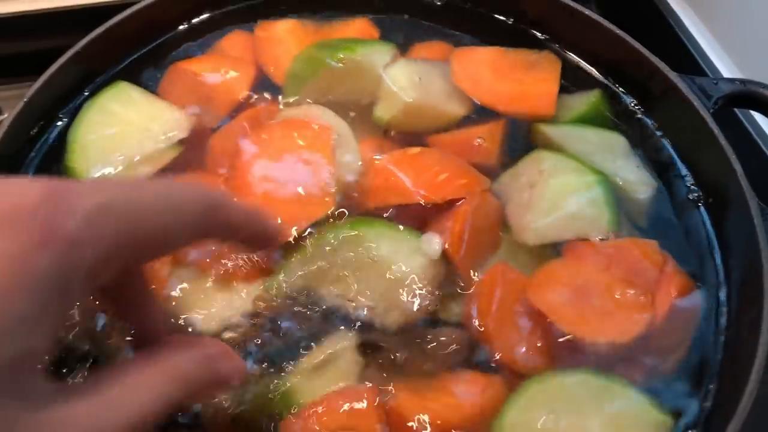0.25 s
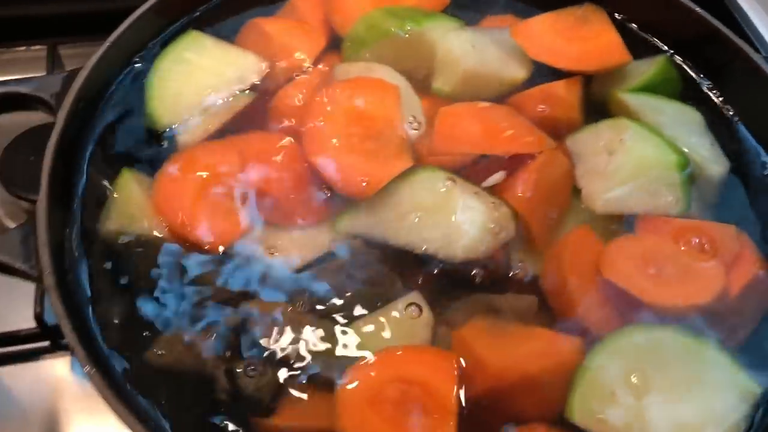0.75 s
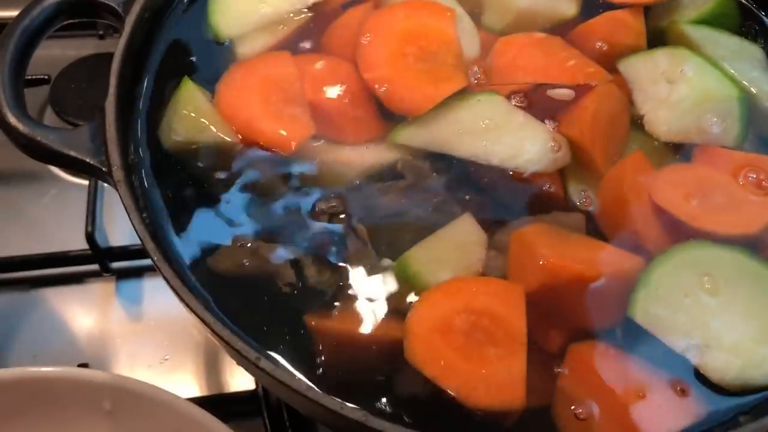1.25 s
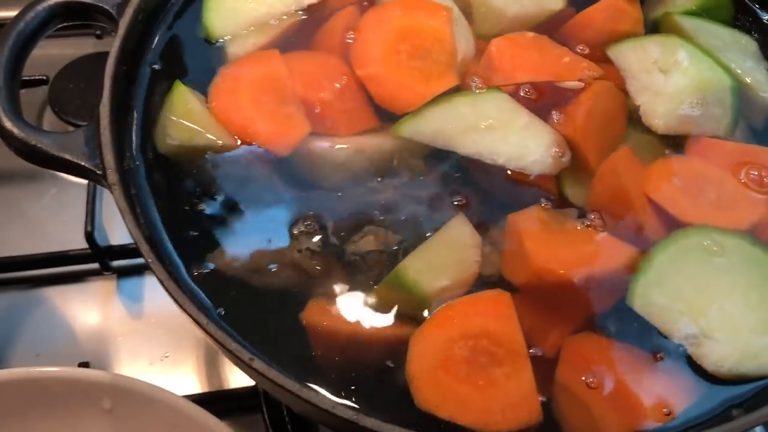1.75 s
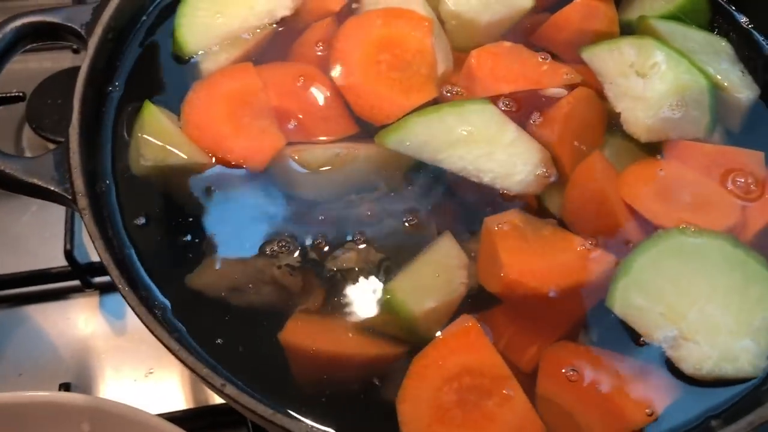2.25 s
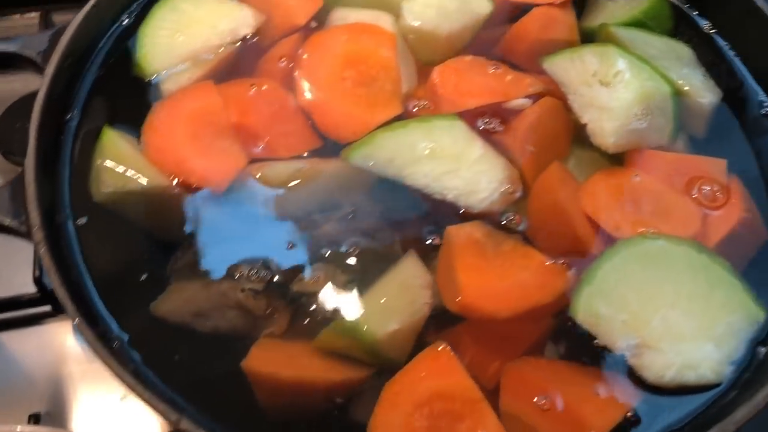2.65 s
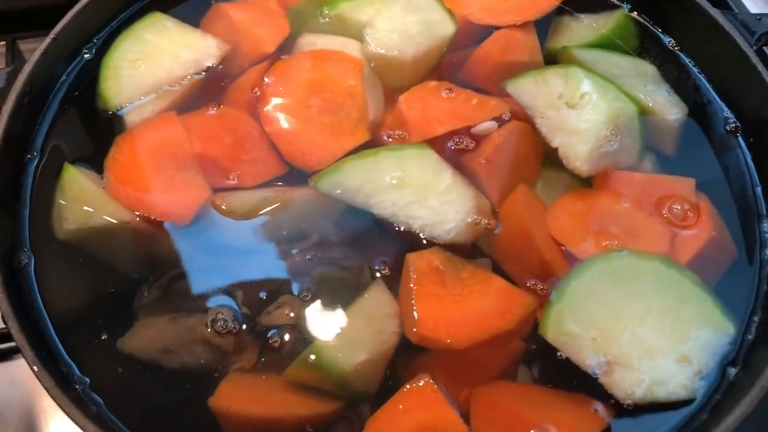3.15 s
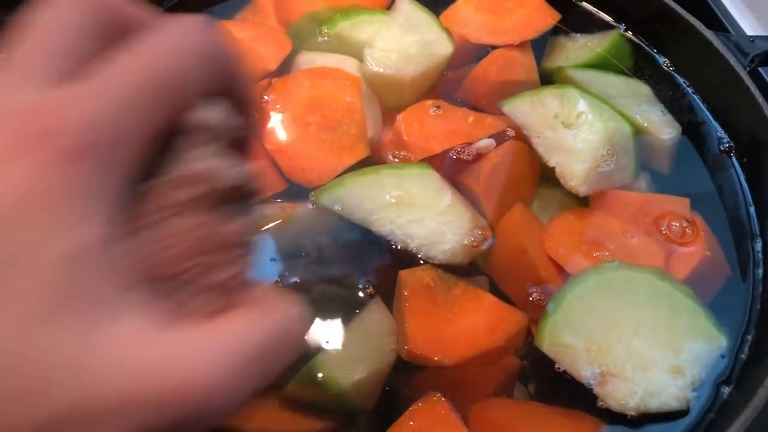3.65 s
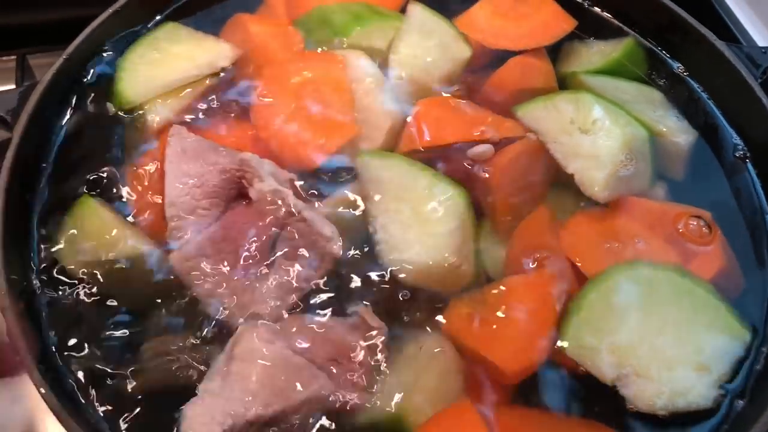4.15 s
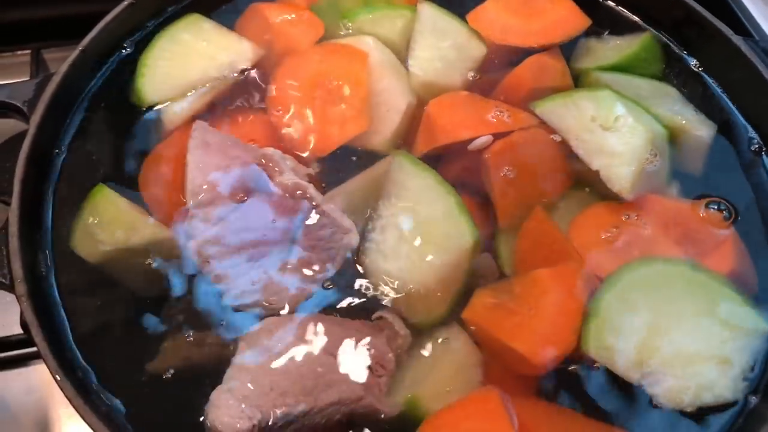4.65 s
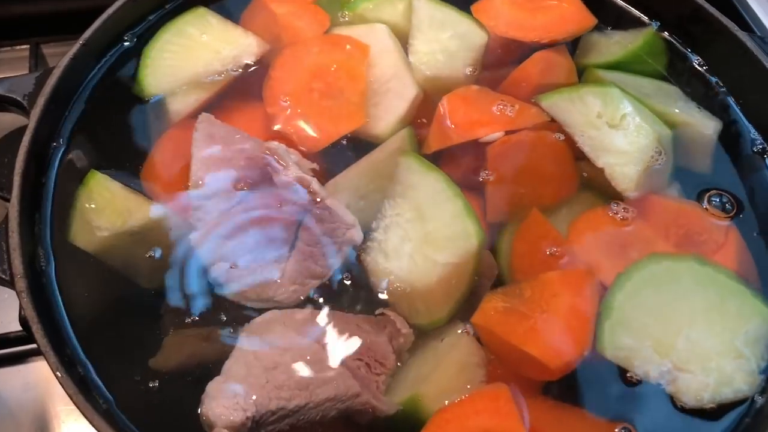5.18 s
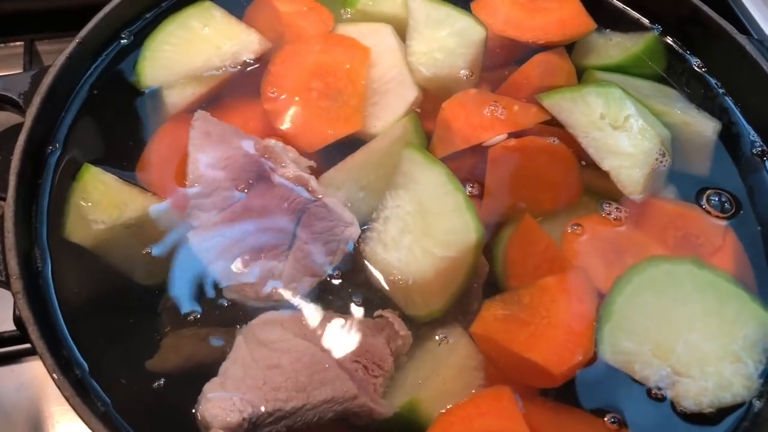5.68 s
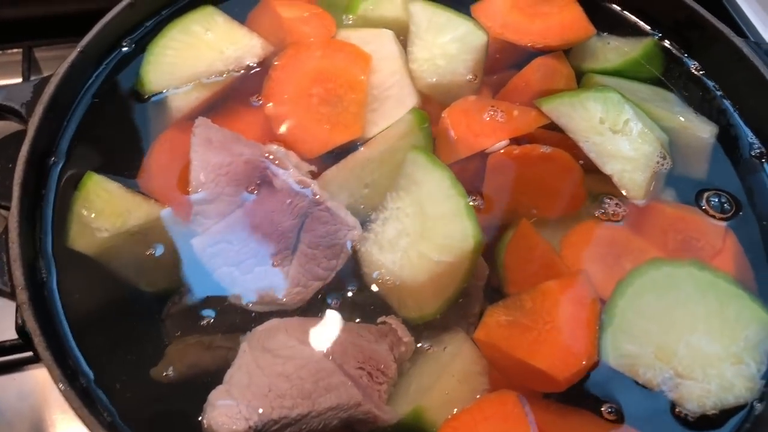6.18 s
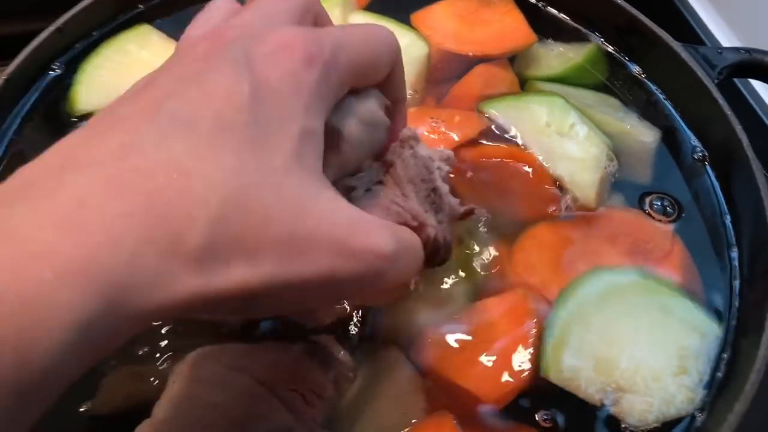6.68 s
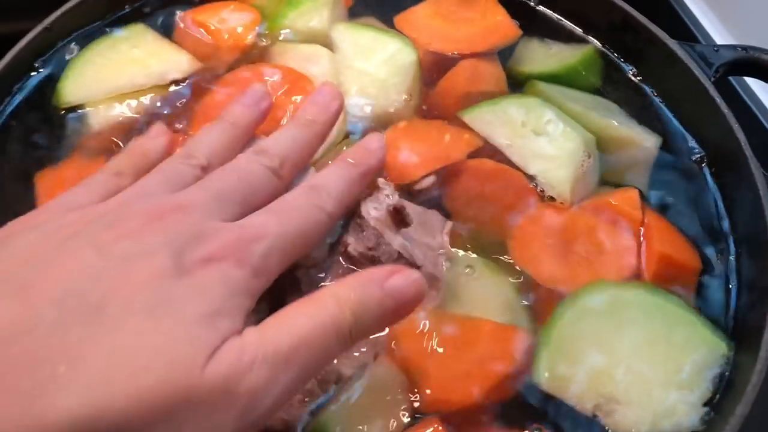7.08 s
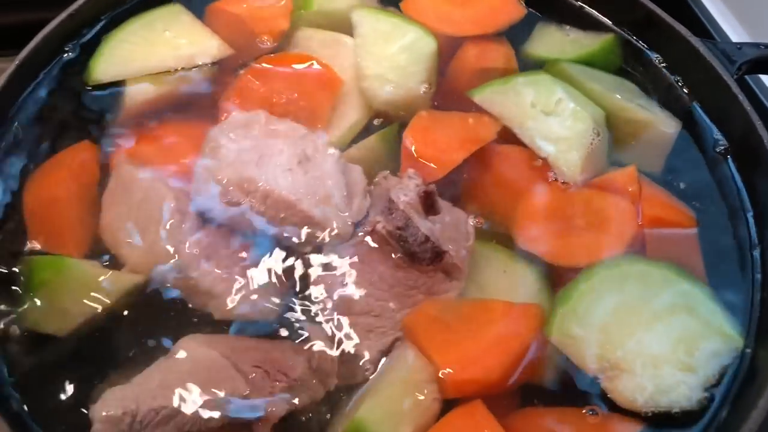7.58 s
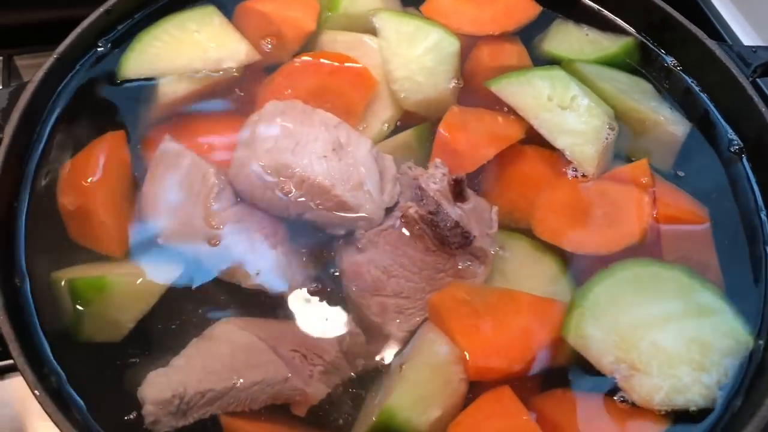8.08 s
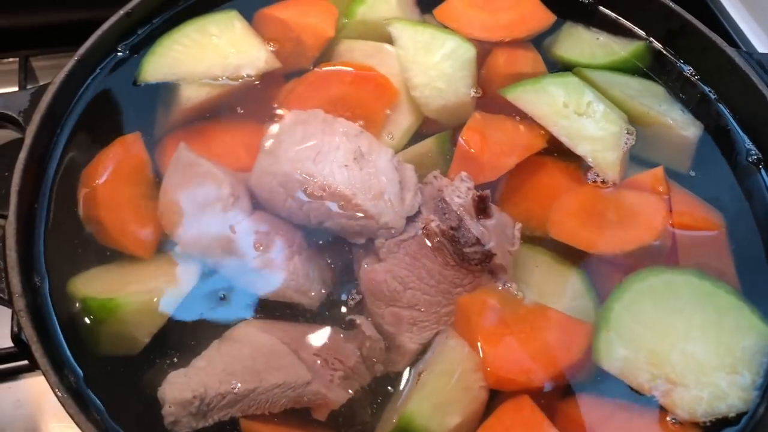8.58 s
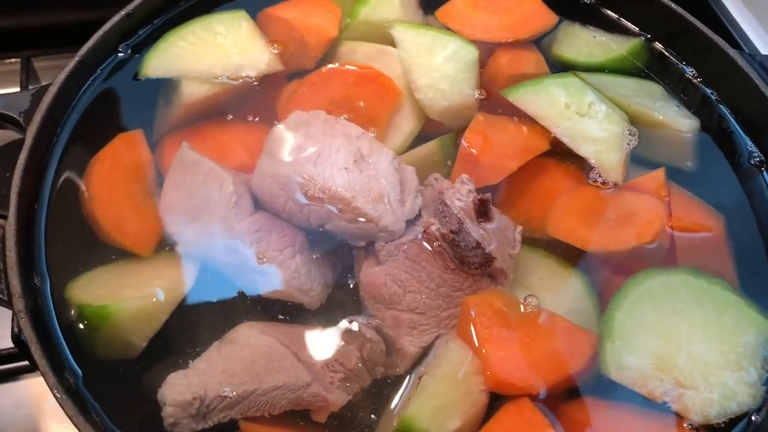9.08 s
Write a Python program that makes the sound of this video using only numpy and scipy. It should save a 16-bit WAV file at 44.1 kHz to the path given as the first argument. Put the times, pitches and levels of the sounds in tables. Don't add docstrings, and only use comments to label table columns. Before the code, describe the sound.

Small crisp wet ticks, a few sticky smacks, sharp dish clacks and one hard counter knock stand out over soft room rumble and fridge hum.

```python
import sys
import numpy as np
from scipy import signal
from scipy.fft import rfft, irfft
from scipy.io import wavfile
from scipy.ndimage import uniform_filter1d

SR = 44100
rng = np.random.default_rng(int(sys.argv[2]) if len(sys.argv) > 2 else 0)


def generate_wav(signal):
    frames = np.transpose(np.atleast_2d(signal))
    scaled = np.clip(frames, -1, 1) * 32767
    pcm = np.round(scaled).astype(np.int16)
    wavfile.write(sys.argv[1], SR, pcm)


def amplitude_ratio(level_db):
    exponent = np.asarray(level_db, float) / 20
    return 10 ** exponent


N = 411453


def evened(x):
    return x / np.sqrt(np.mean(x ** 2) + 1e-20)


def read(points, hz):
    f, value = np.transpose(points)
    return np.interp(np.log(hz + 1), np.log(f + 1), value)


def add(mix, s, sound):
    part = mix[max(round(s * SR), 0):][:len(sound)]
    part += sound[:len(part)]


def swells(t, rows):
    return sum(db * np.exp(-((t - s) / half) ** 2) for s, db, half in rows)


def blow(hz, cycles):
    u = np.arange(int(2 * cycles * SR / hz) + 8) * hz / SR / cycles - 1
    wave = np.exp(-8 * u ** 2) * np.sin(2 * np.pi * cycles * u)
    return wave / abs(wave).max()


def ring(hz, modes, lift_db, factor, rise=0.0001, rock_db=7.5):
    db, t60 = np.transpose(modes)[:, :, None]
    length_s = np.clip(0.6 * t60.max() * factor, 0.05, 0.4)
    t = np.arange(int(SR * length_s)) / SR
    start = rng.random((len(db), 1))
    jolts = rng.standard_normal((len(db), 50))
    rocking = uniform_filter1d(np.repeat(jolts, 441, 1), 441, 1)[:, :len(t)]
    flutter_db = rock_db * rocking * np.minimum(t / 0.03, 1)
    decay_db = 60 * t / (t60 * max(factor, 0.05))
    level_db = db + np.reshape(lift_db, (-1, 1)) - decay_db + flutter_db
    phase = 2 * np.pi * (np.reshape(hz, (-1, 1)) * t + start)
    return (amplitude_ratio(level_db) * np.sin(phase)).sum(0) * (1 - np.exp(-t / rise))


def air():
    # f/Hz, level/dB per Hz
    noise_spectrum = [(15, -33), (30, -6.5), (65, -0.5), (192, -5), (389, -13), (687, -19), (1830, -27.5),
                      (3100, -28.5), (3800, -31.5), (8000, -36), (15650, -39.5), (15950, -61), (16600, -51)]
    # f/Hz, width/Hz, level/dB
    room_modes = [(53, 5.2, -9), (89.8, 9, 9), (118.5, 18.7, 12.5), (187.7, 29, 6.5), (292, 46, 4.5),
                  (501, 43, 4.5), (797, 22, 7.5)]
    # t/s, swell/dB
    footfalls = [
        (1.43, 0.5),
        (2.75, 3),
        (3.53, 4.5),
        (4.7, 4.5),
        (5.05, 0.5),
        (5.72, 0),
        (6.0, 4),
        (7.12, 0),
    ]
    # t/s, swell/dB, half length/s
    sleeve = [
        (3.8, 4.5, 0.14),
        (6.7, 9, 0.24),
        (6.813, 0, .05),
        (8.723, 2.5, 0.11),
    ]
    frames, hz = N // 512 + 6, np.fft.rfftfreq(2048, 1 / SR)
    real, imaginary, patches = rng.standard_normal((frames, len(hz), 3)).T
    patches = evened(uniform_filter1d(uniform_filter1d(patches, 20, 0), 8, 1))
    modes_db = sum(db / (1 + (2 * (hz - f) / width) ** 2) for f, width, db in room_modes)
    t = np.arange(frames) * 512 / SR
    lull = (5.44, -4.5)  # t/s, swell/dB
    steps = [row + (0.11,) for row in footfalls + [lull]]
    low = 1 / (1 + (hz / 320) ** 4)
    high = 1 / (1 + (2500 / (hz + 1)) ** 2)
    swell_db = np.outer(low, swells(t, steps)) + np.outer(high, swells(t, sleeve) - 0.6)
    level_db = (read(noise_spectrum, hz) + modes_db)[:, None] + swell_db + 1.4 * patches
    z = (real + 1j * imaginary) * amplitude_ratio(level_db)
    return amplitude_ratio(-56) * evened(signal.istft(z, nperseg=2048, noverlap=1536)[1][:N])


def compressor():
    # f/Hz, level/dB
    casing = [(2700, -30), (2950, -10), (3005, -6), (3054, 0), (3150, -2.5), (3230, -12), (3350, -17),
              (3600, -30)]
    # t/s, shift/Hz, half length/s
    casing_drift = [(0.05, 45, .2), (1.45, 50, .6)]
    # t/s, level/dB, half length/s
    even_slaps = [(4.85, -9, 2.5)]
    shaft_hz = 49.27
    t, orders = np.arange(N) / SR, np.arange(56, 70)
    slow = t[::512]
    turns = shaft_hz * t
    odd_db, shift_hz = swells(slow, even_slaps), swells(slow, casing_drift)
    odd_turns = 0.09 + swells(t, [(5.3, 0.13, 3.0)])
    buzz = np.zeros(N)
    for k, (start, rate, lag) in zip(orders, rng.random((len(orders), 3))):
        drift_db = 2 * np.sin(2 * np.pi * (0.4 * rate * slow + lag))
        order_db = read(casing, k * shaft_hz - shift_hz) + k % 2 * odd_db + drift_db
        phase = 2 * np.pi * (k * turns + k % 2 * odd_turns + 0.08 * start)
        buzz += np.interp(t, slow, amplitude_ratio(order_db)) * np.cos(phase)
    waver_db = 0.9 * evened(uniform_filter1d(rng.standard_normal(N), 3000)) + swells(t, [(1.3, 2, 0.9)])
    hum = amplitude_ratio(-59.0) * np.sin(2 * np.pi * turns)
    return amplitude_ratio(-77.2 + waver_db) * evened(buzz) + hum


def kitchen(x):
    # f/Hz, t60/s
    reverberation = [(150, 0.3), (600, 0.29), (2000, 0.24), (5000, 0.24), (12000, 0.18)]
    taps = np.zeros(SR // 2)
    at = np.arange(80, len(taps) - 20, 20)
    taps[at + rng.integers(0, 20, len(at))] = rng.choice([-1., 1.], len(at))
    hz, t, z = signal.stft(taps, SR, nperseg=256)
    decay = amplitude_ratio(-60 * t / read(reverberation, hz)[:, None])
    tail = signal.istft(z * decay, SR, nperseg=256)[1]
    return signal.fftconvolve(x, tail / np.linalg.norm(tail))[:N]


def knocks():
    # t/s, peak level/dB, blow pitch f/Hz, worktop ring/dB
    blows = [(0.997, -51.5, 760, 1), (1.7271, -42, 890, -5.5), (3.1406, -37, 980, -14),
             (3.152, -33.5, 323, -18), (3.47, -49.5, 278, 0), (4.368, -36.5, 510, -6),
             (4.401, -39.5, 203, -16), (4.8606, -16.5, 1470, -14.5), (4.8758, -31, 267, -5.5),
             (5.615, -52.5, 1000, -5.5), (4.89, -48, 75, -30), (4.384, -45.5, 75, -30),
             (5.997, -31.5, 1330, -11), (6.012, -38, 557, -7), (7.644, -48, 383, 3),
             (8.697, -42.5, 840, -5.5), (8.703, -46, 378, -3), (8.711, -41, 139, -7)]
    # f/Hz, level/dB, t60/s
    worktop = [(140, -4, .3), (205, -4, .3), (269, -4, .3), (330, -16, .25), (412, -10, .2), (538, -4, .22),
               (660, -12, .25), (830, -11, .15), (969, -7, .2), (1320, -11, .15), (1508, -12, .15),
               (2056, 10, .22), (2309, -16, .2)]
    out, modes = np.zeros(N), np.array(worktop)
    mode_hz = modes[:, 0]
    for s, db, hz, ring_db in blows:
        add(out, s - 0.7 / hz, amplitude_ratio(db) * blow(hz, 1.8))
        reach_db = -12 * np.log2(1 + (mode_hz / (1.7 * hz)) ** 2)
        reach_db -= 4 * np.log2(1 + (0.1 * hz / mode_hz) ** 2)
        reach_db -= 6 * (mode_hz > 1900) * np.log2(1 + (mode_hz / (1.6 * hz)) ** 6)
        add(out, s, ring(mode_hz, modes[:, 1:], db + ring_db - 4 + reach_db, 0.75))
    return out


def lower_dish():
    # t/s, first modes peak level/dB, then second, third and high modes relative level/dB
    clacks = [(1.726, -50, -7, -13, -28), (1.789, -57.5, -15, 0, -12), (3.139, -19.5, -9.5, -13.5, -23.5),
              (4.367, -46, -15, -20, -25), (4.6539, -47, -23, -37, -27), (4.801, -50, -24, -4, -8),
              (4.86, -43, 11.5, 11, -4.5), (5.341, -57, -12, -22, -22), (5.6144, -44.5, -18.5, -28, -37),
              (5.986, -56, 3, -12, 1), (6.0184, -56, -1, -1, 5), (7.642, -54, -11, -20, -25),
              (7.9054, -60.5, -13, 2, -4), (7.9352, -56.5, 0, -7, -23), (8.134, -59, -1, -20, -23),
              (8.2284, -72, 8, -1, -9), (8.295, -57, -0.5, -6, -23), (8.3554, -61, -4, -6, -14),
              (8.6956, -48, -16, -15, 0), (8.8684, -63.5, 10, 1, -18), (9.2557, -52, -12, -26, -31),
              (9.276, -56.5, 0, -25, -25), (1.765, -57, -10, -20, -23), (4.408, -51, -15, -25, -25),
              (4.4635, -55, -10, -20, -20), (4.545, -63, -8, -20, -25), (4.76, -64, -9, -21, -25),
              (5.269, -63, -10, -20, -25), (5.296, -61, -10, -15, -20), (7.688, -58, -8, -15, -25),
              (8.4, -70, 1, -8, -20), (8.436, -70, 2, -10, -20), (8.548, -64, -1, -2, -20),
              (8.59, -66, 1, -8, -20)]
    mode_hz = [1020, 2290, 2406, 2471, 2462, 2610, 4250, 4325, 4285, 6660, 6750, 7900, 8950, 10010, 11560,
               12340, 13170, 14900, 2432, 2447, 2497, 4027, 4221, 4362, 5120, 7117]
    # level/dB, t60/s
    modes = [(-8, .04), (-7, .05), (-18, .33), (0, .07), (-21, .55), (-8, .06), (-23, .55), (-21, .55),
             (4, .08), (0, .045), (-24, .35), (0, .1), (-10, .07), (-1, .1), (-10, .07), (-4, .08),
             (-10, .06), (-6, .06), (-25, .6), (-29, 1.2), (-25, .5), (-24, .25), (-22, .5), (-24, 1.2),
             (-24, .2), (-14, .15)]
    out = np.zeros(N)
    group = np.digitize(mode_hz, [3500, 5000, 7000])
    long_ringing = np.array(modes)[:, 1] > 0.3
    for s, db, second_db, third_db, high_db in clacks:
        force_db = db + max(second_db, 0)
        lift_db = db + np.array([0, second_db, third_db, high_db])[group]
        lift_db = lift_db + 0.24 * (force_db + 22) * long_ringing
        factor = 0.41 + 0.002 * (force_db + 59)
        rise_s = 0.002 * amplitude_ratio(-0.5 * (db + 63.5))
        add(out, s, ring(mode_hz, modes, lift_db, factor, rise_s, 6.5))
    return out


def upper_dish():
    # t/s, third mode peak level/dB, then first and second modes relative level/dB, ring factor
    clinks = [(0.993, -54, -9, -22, 0.83), (1.1482, -67, -11, -27, 0.9), (1.4336, -63, -13, -18, 0.88),
              (1.55, -77, -20, -25, 1.1), (1.587, -75, -20, -25, 0.8), (4.89, -53, -25, -32, 1.3),
              (7.66, -59, -5, -11, 1.4), (1.634, -74, -16, -22, 1.2), (1.7639, -65.5, -10, -16, 0.88),
              (4.363, -35, -14, -22, 0.74), (4.4631, -47.5, -13, -18.5, 0.55),
              (4.6997, -63.5, -3, -16, 0.51), (7.6396, -54.5, -7.5, -16, 1.34),
              (7.7123, -57.5, -5.5, -14, 0.67), (7.9045, -77, 4, -6, 0.73), (8.6499, -64.5, -10, -3, 1.5),
              (8.6972, -56, -9, -6, 0.95)]
    shaken = [
        (4.875, -54, 13, -28, 1.3),
        (6.014, -69, 19, -16, 1.3),
        (8.7, -80, 19, -18, 1.35),
    ]
    mode_hz = [1799, 2974, 4372, 4392, 5976, 7773, 8985, 9727, 11885, 13170, 14220]
    # level/dB, t60/s
    modes = [(-13, 0.3), (0.5, 0.23), (7, 0.078), (-9.5, 0.26), (-4.5, 0.13), (-4, 0.075), (-41, .1),
             (-19, 0.18), (-19, 0.17), (-23, .06), (-21, .1)]
    out = np.zeros(N)
    group = np.digitize(mode_hz, [2200, 3500, 5000])
    for rows, rise_s, rock_db in ((clinks, 0.0015, 4.5), (shaken, 0.035, 1.2)):
        for s, db, first_db, second_db, factor in rows:
            high_db = 3 + 0.3 * (db + 35)
            lift_db = db + np.array([first_db + 19.0, second_db + 12.5, 0, high_db])[group]
            add(out, s, ring(mode_hz, modes, lift_db, factor, rise_s, rock_db))
    return out


def smacks():
    # t/s, peak level/dB, centre f/Hz, t60/s
    wet_smacks = [(3.142, -37.5, 2540, 0.11), (4.866, -35, 2980, 0.1), (6.6765, -34, 6500, 0.048),
                  (6.738, -53.5, 3100, 0.56), (3.838, -52, 9400, .04), (3.874, -32, 2800, 0.037),
                  (5.9961, -32.5, 1380, 0.071), (6.018, -45, 10000, 0.018), (6.6314, -32, 13000, 0.014),
                  (6.6449, -32.5, 1590, 0.024), (6.677, -25, 2960, 0.026), (6.838, -48, 10200, 0.023),
                  (3.899, -51, 6000, 0.032), (4.366, -43.5, 995, 0.14), (6.722, -55, 3500, 0.081),
                  (7.64, -60, 1010, 0.77)]
    face_slaps = [
        (3.138, -30, 4700, 0.024),
        (3.8254, -38, 7200, 0.051),
        (4.365, -31, 5700, 0.012),
        (4.86, -25, 1700, 0.055),
        (5.986, -41, 8900, 0.023),
        (6.8078, -25, 5300, 0.014),
        (6.8231, -29.5, 10700, 0.022),
        (7.637, -43, 6040, 0.022),
        (8.695, -43.5, 4000, 0.025),
    ]
    spatter = [(3.875, -43.5, 11600, 0.065), (3.88, -38, 6150, 0.056), (3.897, -58, 3000, 0.04),
               (5.633, -50, 14000, .02), (5.986, -45, 14600, 0.017), (6.018, -51, 14000, 0.025),
               (6.683, -28, 6900, 0.037), (6.687, -18.5, 4000, 0.028), (6.695, -41, 8400, 0.018),
               (6.696, -36, 15500, .018), (6.685, -38, 12300, .03), (6.68, -35, 7300, 0.027),
               (6.7017, -31.5, 1030, 0.017), (6.8878, -45, 2370, 0.068), (6.887, -49, 4100, 0.088),
               (9.178, -56, 13100, .02), (6.677, -20.5, 2480, 0.023)]
    out, t, hz_axis = np.zeros(N), np.arange(4096) / SR, np.fft.rfftfreq(4096, 1 / SR)
    rows = [row + (1.06,) for row in wet_smacks]
    rows += [row + (2.06 + 0.35 * np.log2(row[2] / 5000),) for row in face_slaps]
    rows += [row + (0.49,) for row in spatter]
    for s, db, hz, t60, octaves in rows:
        clumping_db = 3.5 * np.minimum(rng.exponential(1, 4096), 4)
        snaps = rng.standard_normal(4096) * amplitude_ratio(clumping_db)
        snaps[30] += 14
        band = np.exp(-0.5 * (np.log2((hz_axis + 1) / hz) / (0.5 * octaves)) ** 2)
        burst = evened(irfft(rfft(snaps) * band))
        add(out, s, amplitude_ratio(db - 6 - 60 * t / t60) * burst * (1 - np.exp(-t / 0.0005)))
    return out


def ticks():
    # t/s, peak level/dB, centre f/Hz
    film_ticks = [(0.0074, -48.5, 12600), (0.1156, -44, 15100), (0.1381, -48, 15000),
                  (0.4327, -38, 13900), (0.6524, -45.5, 11100), (0.6724, -49, 14300),
                  (0.859, -48.5, 11200), (0.916, -46, 11100), (0.9977, -35.5, 9300), (1.5253, -41, 10200),
                  (1.8025, -44, 6360), (1.8841, -47, 14100), (1.9894, -53, 12100), (2.03, -48, 12400),
                  (2.2613, -48, 15400), (2.3386, -57, 10600), (2.4074, -56, 13500), (2.7307, -47, 12500),
                  (2.7711, -49, 14700), (2.805, -47, 15200), (2.861, -47, 12500), (3.0746, -51.5, 8300),
                  (7.0963, -51, 7730), (7.117, -52, 6590), (7.1603, -31, 12200), (7.1765, -40, 14200),
                  (7.2564, -48, 9400), (7.429, -35.5, 14700), (7.5737, -54, 15600), (8.6424, -34, 13100),
                  (0.0987, -58, 6000), (0.2952, -60, 6000), (1.8672, -57, 8030), (2.8155, -49, 15400),
                  (5.2185, -61, 3500), (5.3946, -60, 4000), (5.641, -57, 4200), (6.118, -60, 7500),
                  (6.4135, -58, 5780), (6.4594, -58, 6400), (6.5177, -52, 9500),
                  (3.6126, -43, 12000), (3.631, -43, 11500), (3.658, -45, 14300), (3.733, -32.5, 11800),
             (3.7783, -44, 13000), (3.7924, -46, 15600), (4.3224, -32, 12400), (4.7404, -42.5, 11700),
             (4.8734, -39, 7870), (5.1118, -48, 11900), (5.1995, -51, 14000), (5.2975, -55, 8880),
             (5.3797, -48, 15600), (5.6323, -46, 7460), (5.68, -39, 10100), (5.7399, -50, 15200),
             (5.7537, -42, 11200), (5.842, -42, 11000), (5.8785, -50, 12900), (5.8975, -54, 10700),
             (5.9865, -40.5, 7800), (6.017, -33, 10000), (6.332, -38, 13900), (6.5865, -48, 12600),
             (6.6144, -39, 12500), (6.695, -30, 8640), (6.7214, -40, 6400), (6.7615, -53, 6100),
             (6.8761, -35, 9000), (3.8112, -45, 15500), (6.659, -53, 9500), (6.7216, -41, 11900),
             (6.7505, -49, 8500), (6.7625, -50, 12500), (6.787, -54, 12000), (6.8385, -45, 10000),
             (6.909, -50, 7000), (6.944, -56, 13000)]
    # t/s, peak level/dB, f/Hz, cycles
    plips = [(0.1381, -64, 5940, 5.6), (0.4337, -49.5, 8000, 5.7), (0.7138, -59, 6340, 6),
             (1.802, -51, 5780, 3.5), (2.0652, -54, 7840, 3.3), (2.7062, -54, 7260, 1.2),
             (3.119, -44, 6740, 0.64), (3.215, -40.5, 5650, 2.3), (3.607, -52, 7860, 2.6),
             (3.8255, -41, 6100, 3.4), (6.2964, -44, 6950, 0.32), (6.787, -37, 5900, 8.8),
             (6.9303, -42, 6160, 3.4), (8.4567, -59, 11300, 1.7), (8.6298, -52, 11000, 1.6),
             (9.1745, -43.5, 7000, 1)]
    out, t = np.zeros(N), np.arange(900) / SR
    short_snaps = [row + (1.5,) for row in film_ticks]
    for s, db, hz, cycles in short_snaps + plips:
        snap = blow(hz, 1.7 * cycles)
        fizz = rng.standard_normal(len(t)) * amplitude_ratio(-16 - 60 * t / 0.022)
        add(out, s + 0.00056, amplitude_ratio(db) * snap)
        add(out, s + 0.0013, amplitude_ratio(db) * np.convolve(snap, fizz) / np.linalg.norm(snap))
    return out


def scene():
    tick, smack, dish, knock = ticks(), smacks(), upper_dish() + lower_dish(), knocks()
    wet = kitchen(amplitude_ratio(-11.5) * tick + amplitude_ratio(-9.0) * smack + amplitude_ratio(-11.5) * dish + amplitude_ratio(-2.0) * knock)
    return (tick + smack + dish + knock + wet + air() + compressor())[None]


def band_limit(x):
    return signal.sosfilt(signal.butter(12, 16650, fs=SR, output="sos"), x)


def record(dry):
    cut = signal.sosfilt(signal.butter(4, 38, "highpass", fs=SR, output="sos"), dry)
    edge = signal.firwin(255, 16250, window=("kaiser", 9), fs=SR)
    mix = signal.oaconvolve(cut, edge[None], "same")
    return band_limit(mix)


dry = scene()
out = record(dry)
generate_wav(out)
```